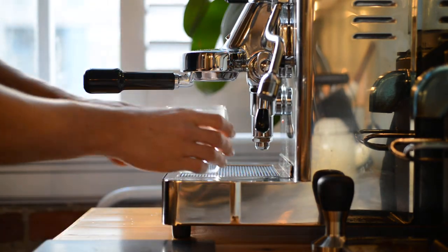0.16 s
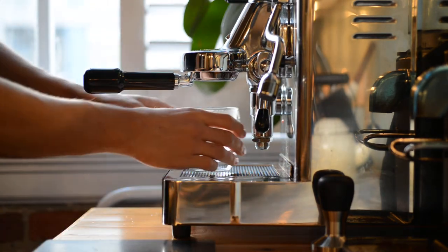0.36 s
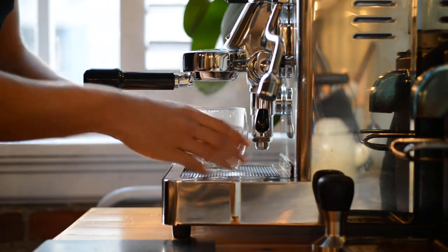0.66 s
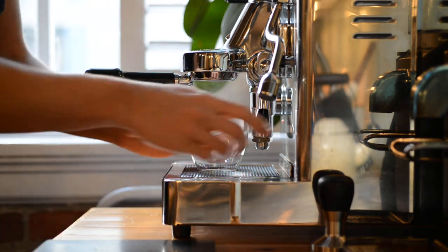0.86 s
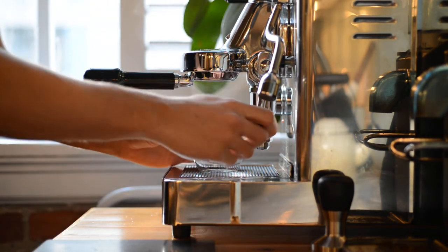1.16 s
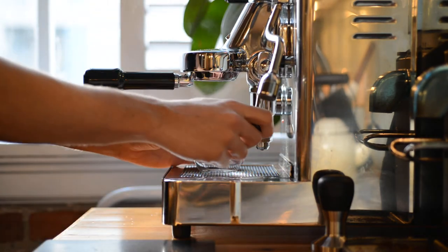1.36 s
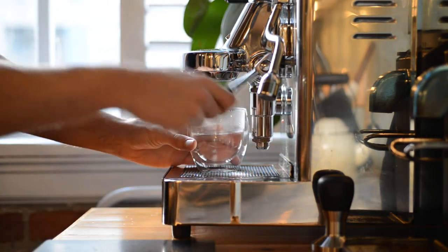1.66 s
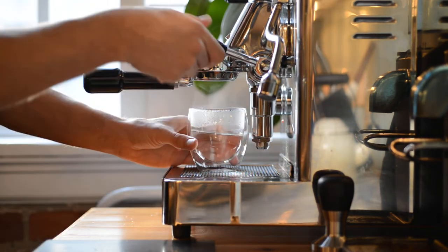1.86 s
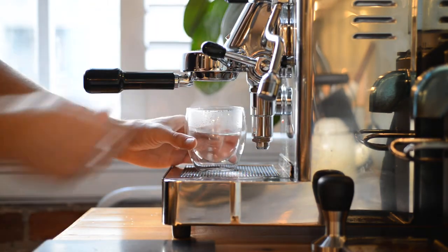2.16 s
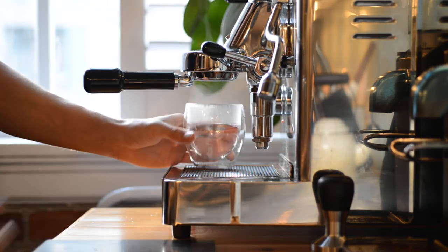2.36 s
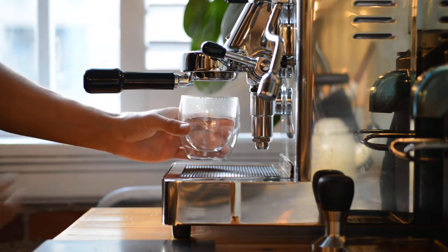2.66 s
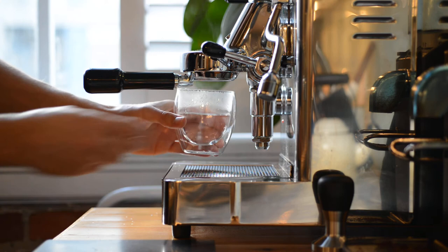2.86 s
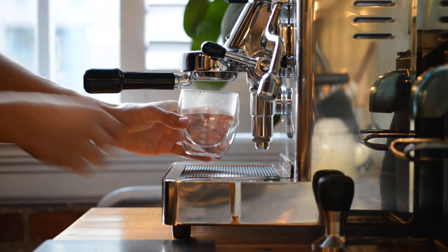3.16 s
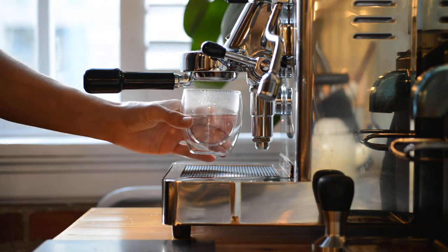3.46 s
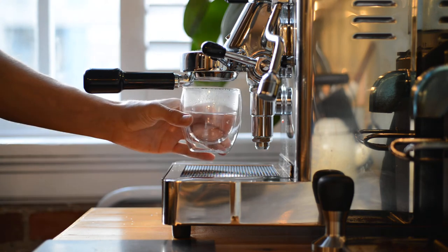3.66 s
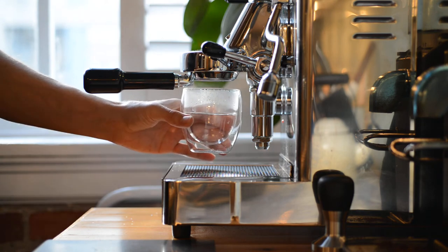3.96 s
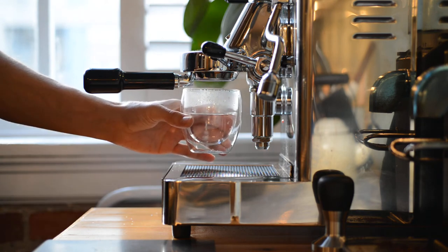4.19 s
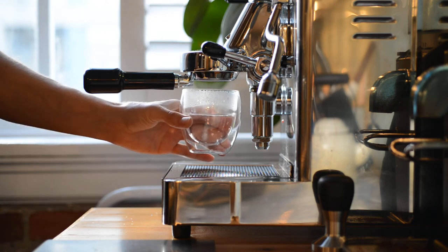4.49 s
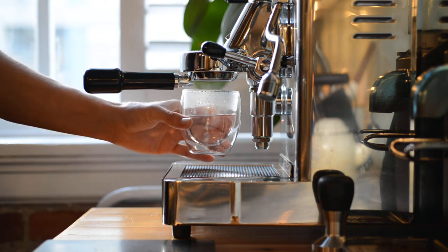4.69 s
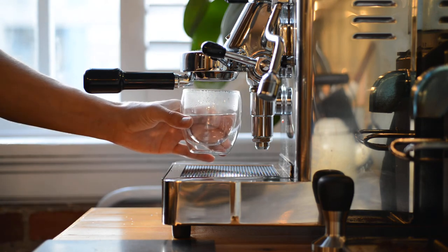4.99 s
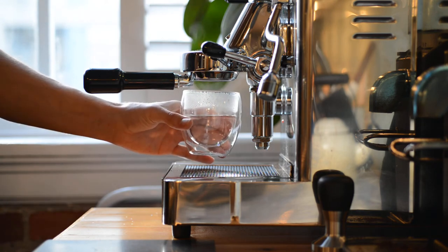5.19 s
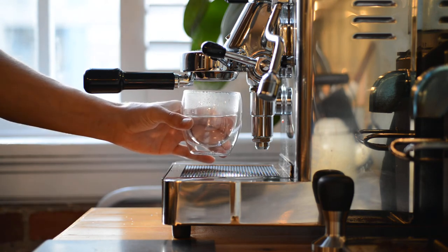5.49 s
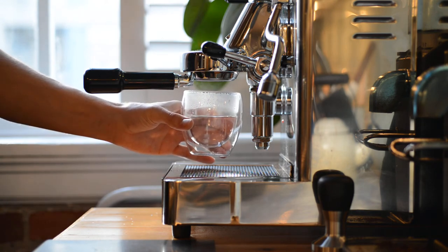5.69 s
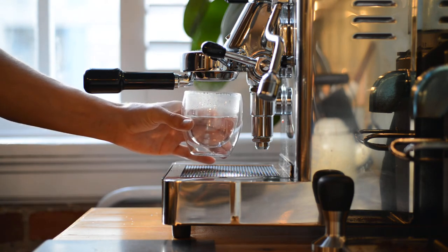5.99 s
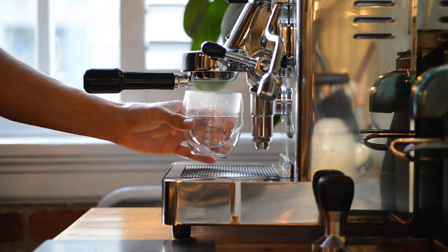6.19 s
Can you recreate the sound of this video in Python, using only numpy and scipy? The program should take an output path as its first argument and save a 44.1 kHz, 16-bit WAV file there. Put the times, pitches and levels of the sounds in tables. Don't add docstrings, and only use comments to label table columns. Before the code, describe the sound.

A glass lands on a metal drip tray with a rattling clatter, a lever knocks home, then an espresso machine pump buzzes steadily.

```python
import sys
import numpy as np
from scipy import signal
from scipy.fft import rfft, irfft
from scipy.io import wavfile

SR = 44100
rng = np.random.default_rng(int(sys.argv[2]) if len(sys.argv) > 2 else 0)


def rack_gain(trim_db):
    fader = np.asarray(trim_db, float)
    return 10 ** (fader / 20)


def to_wav(sig):
    pcm = np.clip(np.atleast_2d(sig), -1, 1) * 32767
    pcm = np.round(pcm).astype(np.int16)
    wavfile.write(sys.argv[1], SR, pcm.T)


N = 279594
TIME = np.arange(N) / SR


def rms_one(x):
    return x / np.sqrt(np.mean(x ** 2) + 1e-20)


def in_time(rows):
    s, *columns = np.transpose(rows)
    return [np.interp(TIME, s, c) for c in columns]


def at_hz(points, hz):
    table_hz, level_db = np.transpose(points)
    return np.interp(np.log(hz), np.log(table_hz), level_db)


def held(start_s, length_s, edge_s):
    end_s = start_s + length_s + edge_s
    return np.clip(np.minimum(TIME - start_s, end_s - TIME) / edge_s, 0, 1)


def drift(rate, count=1):
    r = np.exp(-128 * np.pi * rate / SR)
    chance = rng.standard_normal((count, N // 64 + 1502))
    slow = signal.lfilter([1], [1, -2 * r, r * r], chance)[:, 1500:]
    return np.array([np.interp(np.arange(N) / 64, np.arange(len(s)), rms_one(s)) for s in slow])


def coloured(x, spectrum, peaks=()):
    hz = np.maximum(np.fft.rfftfreq(len(x), 1 / SR), 1)
    humps = sum(rack_gain(db) / (1 + (2 * (hz - f) / width) ** 2) for f, width, db in peaks)
    return irfft(rfft(x) * rack_gain(at_hz(spectrum, hz)) * (1 + humps), len(x))


def ring(x, hz, t60):
    r, w = rack_gain(-60 / (t60 * SR)), 2 * np.pi * hz / SR
    return signal.lfilter([0, np.sin(w)], [1, -2 * r * np.cos(w), r * r], x + 1e-18)


def bandpass(x, low, high):
    return signal.sosfilt(signal.butter(2, [low, high], "band", fs=SR, output="sos"), x)


def blows(events, modes, crash, rise_s, contact_s, crash_s, longest_s, ring_db, crash_db, spread_db,
          pivot_hz=1500):
    out, first = np.zeros((2, N)), round(events[0][0] * SR)
    size = min(SR, N - first)
    here = slice(first, first + size)
    grit = rng.standard_normal((3, size)) * rack_gain(2.5 * rng.exponential(1, (3, size)))
    luck = rng.normal(0, spread_db, (len(events), 40))
    since = np.maximum(np.arange(size) / SR + first / SR - np.array(events)[:, :1], 0)
    loudest = max(db for s, db, bright in events)

    def shower(hz, fade_s, k):
        top = np.clip(np.log2(hz / pivot_hz) / 1.07, 0, 1)
        total = 0
        for i, (s, db, bright) in enumerate(events):
            level = rack_gain(db + top * (bright - events[0][2]) + luck[i, k])
            build_s = rise_s * (2.5 + 0.51 * (loudest - db))
            total = total + level * np.exp(-since[i] / fade_s) * (1 - np.exp(-since[i] / build_s))
        return total

    for k, (hz, db, t60) in enumerate(modes):
        rung = ring(grit[0] * shower(hz, contact_s, k), hz, min(t60, longest_s))
        out[0, here] += rack_gain(loudest + ring_db + db) * rung / np.abs(rung).max()
    noise = [rms_one(coloured(g, crash)) for g in grit[1:]]
    for k, low in enumerate(100 * 2 ** np.arange(7.25)):
        band = bandpass(noise[k % 2], low, min(2 * low, .45 * SR))
        fade_s = crash_s * (low / 2000) ** -.25
        out[1, here] += rack_gain(crash_db) * band * shower(2.0 * low, fade_s, 30 + k)
    return out


# pitch_hz, level_db [dB per Hz]
AIR_SPECTRUM = [(15, -46), (25, -10), (64, -9.5), (101, -3.5), (305, -8.5), (340, -4), (410, -12.5),
                (445, -13), (762, -14), (895, -15.5), (1450, -18), (2630, -24.5), (15500, -38)]


def room_air():
    return rack_gain(-47.5 + .8 * drift(5)[0]) * rms_one(coloured(rng.standard_normal(N), AIR_SPECTRUM))


# pitch_hz, t60_s
KITCHEN_DECAY = [(150, 0.7), (1000, 0.59), (4000, 0.54), (12000, 0.22)]


def kitchen(x):
    t, echo = np.arange(SR) / SR, 0
    for low in 80 * 2 ** np.arange(7.5):
        band = bandpass(rng.standard_normal(SR), low, 2 * low)
        echo = echo + band * rack_gain(-60 * t / at_hz(KITCHEN_DECAY, 1.0 * low)) * (t > .006)
    return signal.fftconvolve(x, echo / np.sqrt(np.sum(echo ** 2)))[:N]


# start_s, length_s, level_db
RUB = [(.56, 0.13, -56.5), (0.887, 0.096, -52.5), (.98, 0.089, -56), (1.064, .002, -53), (1.07, .52, -54.5),
       (1.216, 0.1, -63)]
# pitch_hz, level_db [dB per Hz]
RUB_COLOUR = [(240, -39), (400, -4), (510, -7), (640, -11), (1090, -18), (1210, -7), (2290, -11.5),
              (4810, -8), (6710, -9.5), (7810, -23), (15000, -29)]
SQUEAK = 1.003, .022, 3630, -52


def hand():
    edge_s, rest_db = 0.028, -63
    cam_s, cam_hz, cam_width_hz = 1.08, 4900, 250
    grit = rng.standard_normal(N) * rack_gain(1.8 * rng.exponential(1, N))
    first_s, knock_s = RUB[0][0], LEVER[0][0]
    slides = rack_gain(rest_db) * held(first_s, knock_s - first_s, edge_s)
    slides += sum(rack_gain(db) * held(s, length_s, edge_s) for s, length_s, db in RUB)
    skin = rms_one(coloured(grit, RUB_COLOUR, [(cam_hz, cam_width_hz, -3)]))
    rub = slides * rack_gain(1.4 * drift(25)[0]) * skin
    cam = rms_one(ring(grit, cam_hz, 3.0 / cam_width_hz)) * held(cam_s, knock_s - cam_s, edge_s)
    cam_db = -65 + 16 * (TIME - cam_s) + 2.5 * drift(15)[0]
    s, length_s, hz, db = SQUEAK
    squeak = rack_gain(db + 2.5 * drift(60)[0]) * held(s, length_s, edge_s) * np.sin(2 * np.pi * hz * TIME)
    return rub + rack_gain(cam_db) * cam + squeak


# start_s, pitch_hz, level_db, t60_s
THUDS = [
    (.184, 700, -18, .26),
    (.214, 700, -24, .14),
    (.2155, 5060, -20, .07),
    (.315, 5060, -34, .2),
    (.487, 5060, -41, .16),
    (1.719, 6880, -28, .06),
    (1.753, 8600, -37, .06),
    (1.793, 6900, -33, .06),
    (1.797, 200, -18, .15),
]


def thuds():
    return sum(rack_gain(db) * ring(np.arange(N) == round(s * SR), hz, t60) for s, hz, db, t60 in THUDS)


# start_s, peak_db, brightness_db
SET_DOWN = [(0.17, -7, -4.5), (0.176, -16, -9), (0.183, -25, -19), (0.195, -20, -12), (0.214, -10.5, -11),
            (0.231, -21, -18.5), (0.279, -26, -5.5), (0.304, -23, -9.5), (0.344, -29, -11),
            (0.387, -25, -12), (0.407, -26, -14), (0.46, -32.5, -9), (0.486, -30.5, -9), (0.505, -33, -11),
            (0.539, -41, -23), (0.599, -43, -15), (0.649, -44, -10), (0.694, -51, 6), (0.76, -40, -8)]
# pitch_hz, level_db, t60_s
TRAY = [(257, -2, 0.12), (348, -22, 0.13), (2230, -4, 0.038), (3980, -3, 0.031), (4570, -16, .04),
        (5200, -15, 0.11), (6140, -8, .04), (7000, -11, .02)]
# pitch_hz, level_db [dB per Hz]
TRAY_CRASH = [(100, -25), (200, -14), (500, -12.5), (1000, -12.5), (2000, -11.5), (3000, -13), (5000, -6),
              (6500, -12.5), (9000, -21.5), (15500, -35)]


def set_down():
    return blows(SET_DOWN, TRAY, TRAY_CRASH, rise_s=0.00025, contact_s=0.015, crash_s=0.021, longest_s=.15,
                 ring_db=-10.0, crash_db=-5.5, spread_db=1.7)


# start_s, peak_db, brightness_db
LEVER = [
    (1.596, -4, -2),
    (1.599, -8.5, -8),
    (1.61, -5.5, -16),
    (1.642, -19, -13),
]
# pitch_hz, level_db, t60_s
BRASS = [(275, -6, 0.087), (605, -15.5, 0.14), (1238, -13, .14), (1410, -10, 0.16), (1555, -11, .1),
         (1880, -11, .08), (2676, -1.5, 0.12), (2895, -12, 0.12), (3580, -17, 0.088), (4600, -1, 0.026),
         (5890, -5, .06), (7550, -5, .06), (9900, -4.5, 0.027), (2580, -0.5, 0.1)]
# pitch_hz, level_db [dB per Hz]
BRASS_CRACK = [(120, -36), (280, -26), (420, -30), (600, -13), (950, -22), (1300, -2.5), (2100, -9),
               (2640, 2), (3300, -7), (6000, -4.5), (9000, -14.5), (15500, -27)]


def lever():
    return blows(LEVER, BRASS, BRASS_CRACK, rise_s=0.00016, contact_s=0.0049, crash_s=0.006, longest_s=.14,
                 ring_db=-8.5, crash_db=-3.5, spread_db=1.5)


# start_s, peak_db, brightness_db
LATCH = [(1.6417, -19, -21), (1.6475, -14.5, -27), (1.7185, -19, -11), (1.7374, -19, -16),
         (1.7512, -22, -14), (1.7925, -26, -21)]
# pitch_hz, level_db, t60_s
SPRING = [(4300, -12, .04), (4700, -16, 0.043), (5520, 0, 0.026), (5920, 1, 0.04), (6920, -10, 0.06),
          (7460, -11, .1), (8800, -24, 0.04)]


def latch():
    return blows(LATCH, SPRING, RUB_COLOUR, rise_s=0.00099, contact_s=0.0029, crash_s=0.0056, longest_s=.06,
                 ring_db=-5.5, crash_db=-3.5, spread_db=2.5, pivot_hz=5160)


# start_s, peak_db, brightness_db
CLINK = [
    (2.8552, -15.5, 3),
]
# pitch_hz, level_db, t60_s
GLASS = [(1830, -5, .25), (5385, -4, .17), (5415, -7, .17), (7860, -15, .08), (7950, -15, .08),
         (3700, -14, .16), (3770, -15, .16), (1863, -4, .25), (4200, -6, .025), (6100, -12, .05),
         (7150, -13, .07), (9500, -30, .06), (12200, -20, .08), (14800, -11, .05)]
# pitch_hz, level_db [dB per Hz]
GLASS_TICK = [(300, -30), (1000, -8), (4000, 0), (7000, -8), (10000, -18), (12000, -30), (15500, -45)]


def clink():
    struck = blows(CLINK, GLASS, GLASS_TICK, rise_s=2e-4, contact_s=2e-4, crash_s=0.0077, longest_s=.25,
                   ring_db=-1, crash_db=-7.0, spread_db=2)
    return signal.sosfilt(signal.butter(4, 9000, fs=SR, output="sos"), struck)


def stroke_phase(k):
    if 4 <= k <= 12:
        return np.pi - .11 * (k - 4) ** 2 + np.pi / 2 * (k % 2)
    if 13 <= k <= 17:
        return -.72 * (k - 15) ** 2
    return 2 * np.pi * rng.random()


# start_s, case_ring_db, piston_stroke_db
PUMP = [
    [(1.77, -26.5, -28), (1.804, -27.5, -25), (1.836, -22, -30), (1.854, -25, -25.5), (1.914, -27, -27.5),
     (2.83, -27.5, -29)],
    [(2.95, -27.5, -28), (3.34, -27, -28.5), (3.52, -32, -28.5), (4.47, -32, -28.5), (4.86, -28.5, -28.5),
     (6.09, -29, -28), (6.33, -31.5, -28)],
]
# multiple [of stroke rate], level_db
STROKE = [(1, -16.5), (2, -16), (3, -17), (4, -1), (5, -10), (6, -3), (7, -19), (8, -13), (9, -12.5),
          (10, -12), (11, -13), (12, -31), (13, -10), (14, -4.5), (15, 0.5), (16, -4.5), (17, -6.5),
          (18, -13.5), (19, -26), (20, -14.5), (21, -20), (22, -14.5), (23, -40)]
# multiple [of stroke rate], level_db
BUZZ = [(24, -22), (25, -19.5), (26, -25), (27, -12.5), (28, -16.5), (29, -15), (30, -18.5), (31, -9.5),
        (32, -25), (33, -18), (34, -23), (35, -22.5), (36, -26.5)]
# pitch_hz, level_db [rms]
WHINE = [(2283, -60), (2519, -52.5), (2880, -53), (3241, -54.5), (3359, -55.5), (3720, -59), (4048, -53),
         (4199, -49), (4317, -57), (4678, -52.5), (4737, -58), (4861, -54), (4980, -54), (5039, -52),
         (5281, -52.5), (5399, -53), (5577, -59), (5701, -55)]
# pitch_hz, level_db [dB per Hz]
CHATTER = [(35, -30), (60, -24), (150, -13), (350, -2), (700, -6.5), (1300, -7), (2100, -10.5), (2500, -14),
           (3700, -14), (4300, -12.5), (5500, -12.5), (6000, -16), (7200, -16.5), (8500, -26.5),
           (11000, -32.5), (15500, -37)]
# pitch_hz, width_hz, level_db
CASE = [(900, 150, 2), (1800, 200, 0), (4150, 150, -2), (4680, 120, 0), (5720, 130, 4), (6160, 110, 4)]
# multiple [of stroke rate], gain_db [none to full pressure]
PRESSURE_SHIFT = [(14, -3), (17, 6), (18, 8), (19, 7), (20, 7), (21, -4), (23, -7), (26, 9), (28, 4),
                  (32, 5)]


def pump():
    stroke_hz, start_s, pressure_s = 60, 1.744, 2.5
    ring_db, stroke_db = [c - c[TIME > 3.2].mean() for c in in_time(PUMP[0] + PUMP[1])]
    since_s = TIME - start_s
    dry_db = 10 * np.exp(-np.maximum(since_s, 0) / .02)
    buzz_db = -0.11 * ring_db + dry_db
    hiss_db = 0.13 * ring_db + dry_db

    lines = [(round(k), db - 29.5) for k, db in STROKE + BUZZ]
    lines += [(round(hz / stroke_hz), db) for hz, db in WHINE]
    named = [k for k, db in lines]
    lines += [(k, -63 + 2.5 * rng.normal()) for k in range(37, 104) if k not in named]

    pressure = -np.exp(-since_s / pressure_s)
    pressure -= pressure[TIME > start_s].mean()
    shift_db = dict(PRESSURE_SHIFT)
    waver, out = drift(7.2, count=24), np.zeros(N)
    on = slice(round(start_s * SR), N)
    for i, (k, db) in enumerate(lines):
        if k == 15:
            swell_db = ring_db
        else:
            swell_db = stroke_db if k < 24 else buzz_db if k < 37 else hiss_db
        loose = .03 + .005 * k
        phase = 2 * np.pi * k * stroke_hz * TIME[on] + loose * waver[i % 24, on] + stroke_phase(k)
        level_db = db + swell_db[on] + shift_db.get(k, 0) * pressure[on] + 0.6 * waver[(i + 11) % 24, on]
        out[on] += np.sqrt(2) * rack_gain(level_db) * np.cos(phase)

    chatter = rms_one(coloured(rng.standard_normal(N), CHATTER, CASE))
    pulse = 1 + .28 * np.cos(2 * np.pi * stroke_hz * TIME)
    out += rack_gain(-33 + hiss_db + 0.5 * drift(11)[0]) * pulse * chatter
    return out * np.clip(since_s / .025, 0, 1)


def scene():
    hits = set_down() + lever() + latch() + clink()
    no_bass = signal.butter(4, 170, "high", fs=SR, output="sos")
    rings, crashes = signal.sosfilt(no_bass, hits)
    echo = kitchen(rack_gain(-9.5) * crashes + rack_gain(-13) * rings)
    return (room_air() + echo + hand() + thuds() + rings + crashes + pump())[None]


def band_limit(x):
    return signal.sosfilt(signal.butter(12, 16540, fs=SR, output="sos"), x)


def record(dry):
    rounded = .8 * np.tanh(dry / .8)
    mix = signal.sosfilt(signal.ellip(10, .5, 70, 15750, fs=SR, output="sos"), rounded)
    return band_limit(mix)


dry = scene()
out = record(dry)
to_wav(out)
```